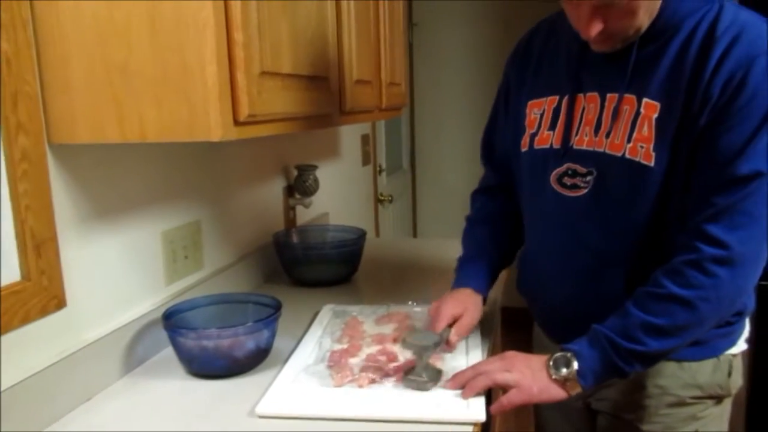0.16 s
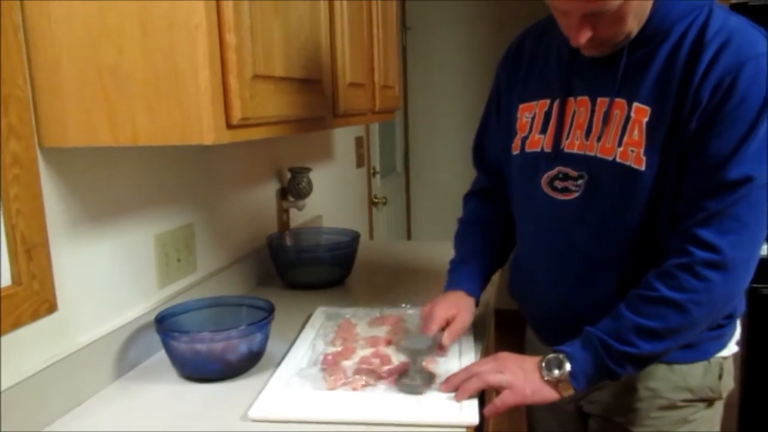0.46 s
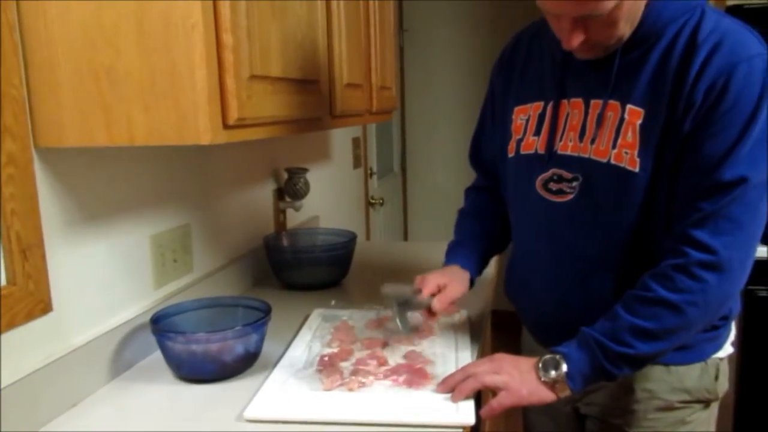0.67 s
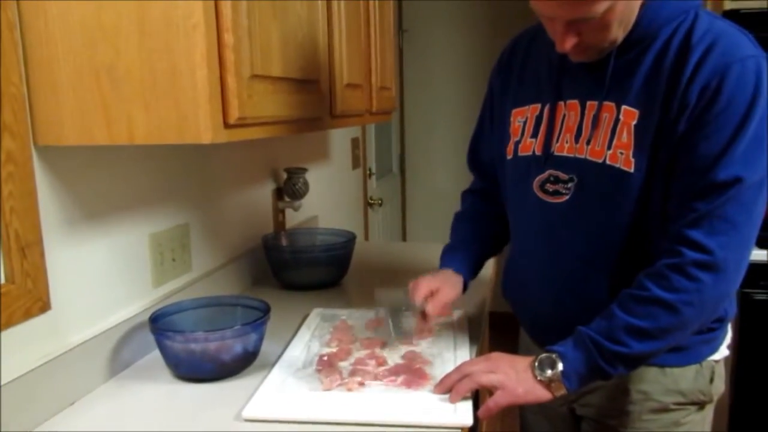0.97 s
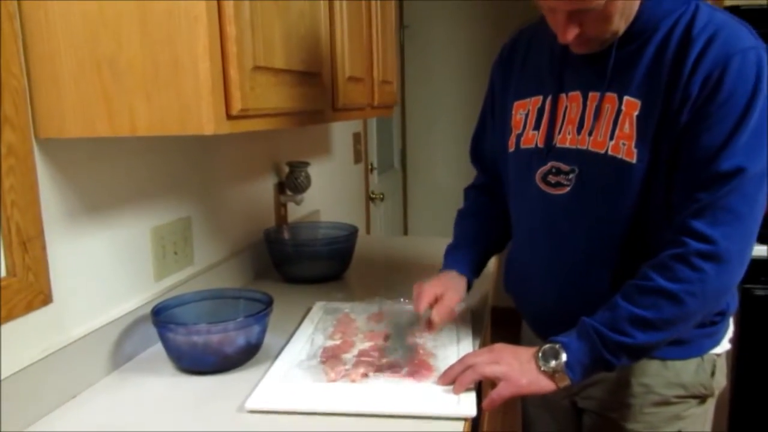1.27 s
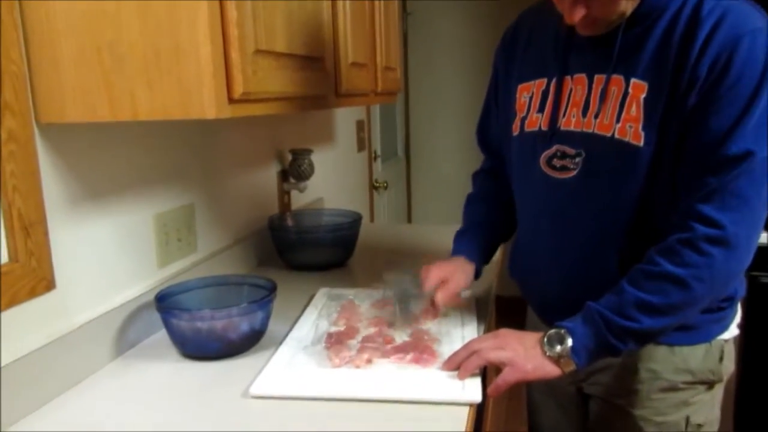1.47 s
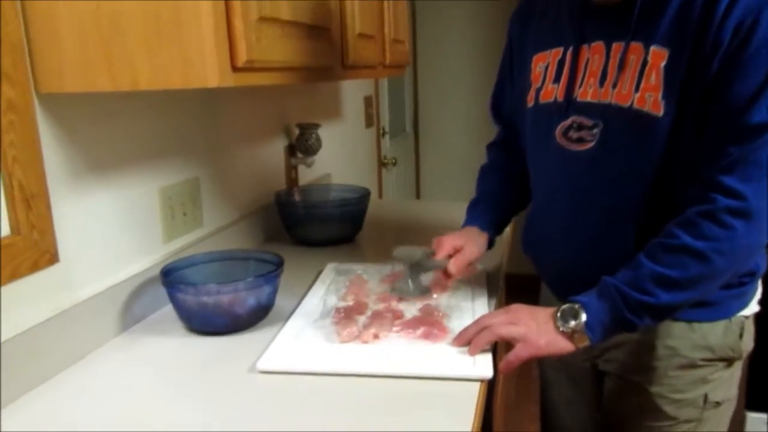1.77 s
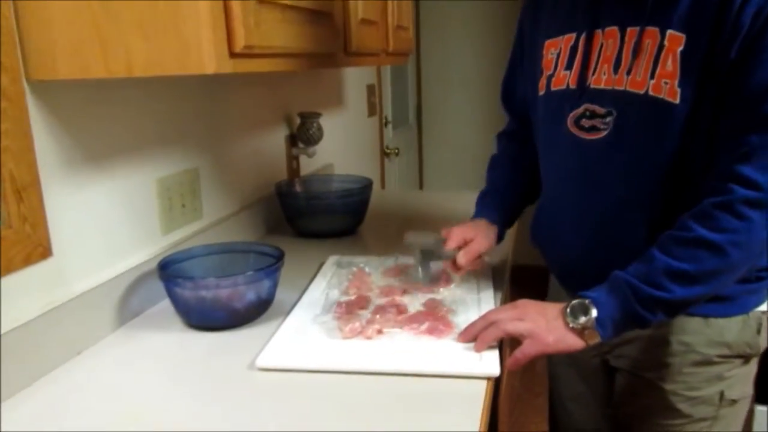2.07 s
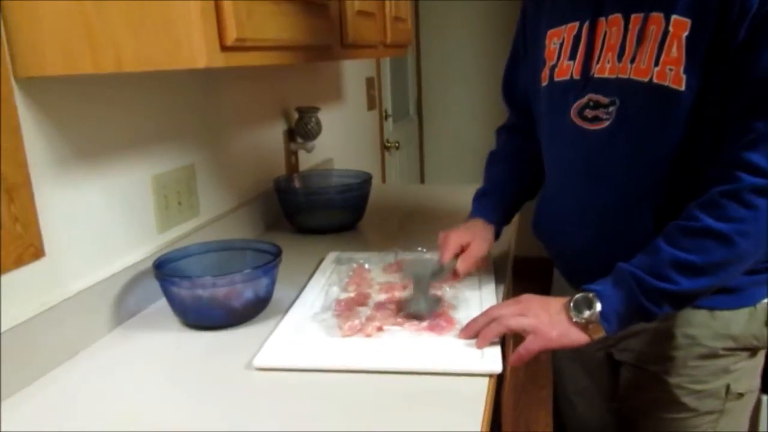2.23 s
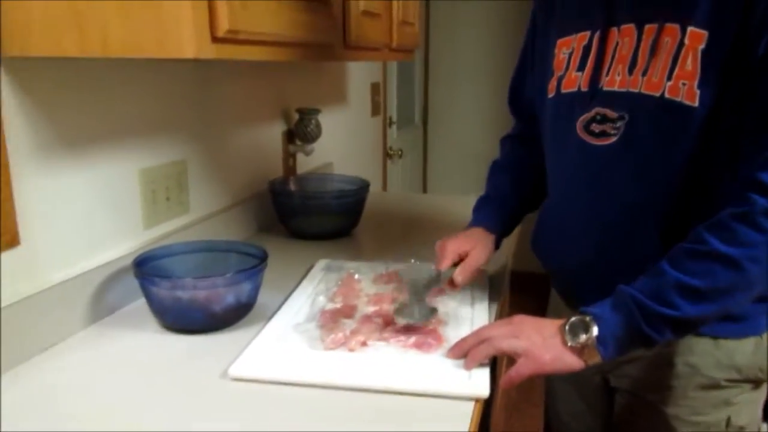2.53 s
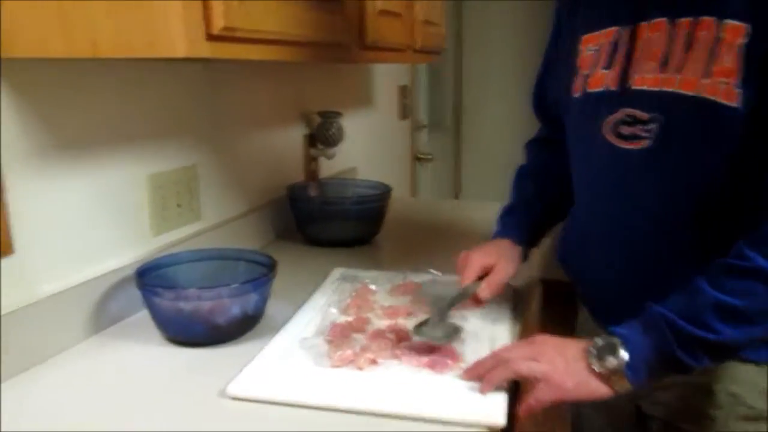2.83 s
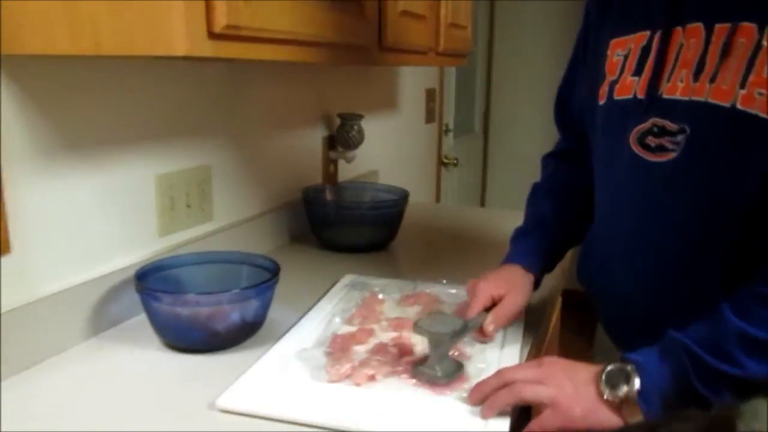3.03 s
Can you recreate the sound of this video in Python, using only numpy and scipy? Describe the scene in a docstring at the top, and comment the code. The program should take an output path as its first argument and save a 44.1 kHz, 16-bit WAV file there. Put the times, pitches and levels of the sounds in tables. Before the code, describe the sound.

A metal mallet pounds film-wrapped meat on a plastic board, about three steady blows a second.

```python
"""A metal mallet pounds wrapped meat on a plastic board, about three blows a second, over a quiet hum.
It opens on the tail of a blow struck just before the start, then each blow cracks and slaps the film
(shaped noise) while it rings the board and thumps the counter (decaying modes). After some blows the
board bounces back with a duller click. Film ticks are scattered through the first two seconds or so;
grainy rustles follow two late blows. The kitchen rings on after each contact as fading bands of noise."""
import sys
import numpy as np
from scipy import signal
from scipy.fft import rfft, irfft
from scipy.io import wavfile

SR = 44100
rng = np.random.default_rng(int(sys.argv[2]) if len(sys.argv) > 2 else 0)


def wav_out(sig):
    """Save sig, one row per channel (or a flat mono array), as 16-bit PCM at SR to the path in sys.argv[1]."""
    wavfile.write(sys.argv[1], SR, np.round(np.clip(np.atleast_2d(sig).T, -1, 1) * 32767).astype(np.int16))


N = 141120
T = np.arange(N) / SR


def undb(db):
    """Decibels to linear gain."""
    return 10 ** (np.asarray(db) / 20)


def read(table, hz):
    """Value of an (Hz, value) table, interpolated on a log-frequency axis."""
    table_hz, values = np.array(table)[:, 0], np.array(table)[:, 1]
    return np.interp(np.log(hz + 1), np.log(table_hz), values)


def noise(gain_of_hz, size=N):
    """Noise with the given gain at each frequency, scaled to rms 1."""
    spectrum = rfft(rng.standard_normal(size))
    shaped = irfft(spectrum * gain_of_hz(np.fft.rfftfreq(size, 1 / SR)), size)
    return shaped / shaped.std()


def band(centre_hz, octaves):
    """Bell-shaped gain on an octave axis; octaves is its standard deviation."""
    return lambda hz: np.exp(-.5 * (np.log2((hz + 1) / centre_hz) / octaves) ** 2)


def burst(start, rise, fall):
    """Envelope that rises and dies away; the slower the rise against the fall, the lower its peak under 1."""
    since = np.maximum(T - start, 0)
    return (1 - np.exp(-since / rise)) ** 2 * np.exp(-since / fall)


def ring(start, hz, gain, t60):
    """Sum of exponentially decaying sine modes struck at start, cut off after 1.5 s."""
    since = np.maximum(T - start, 0)[:, None]
    since = since[T < start + 1.5]
    modes = np.sin(2 * np.pi * hz * since) * np.exp(-np.log(1000) * since / t60)
    out = np.zeros(N)
    out[:len(since)] = modes @ gain
    return out


# colour of the hum: (frequency [Hz], relative level [dB per Hz])
HUM_COLOUR = [(18, -43), (30, 11), (499, -5.5), (540, -7), (801, -24), (1070, -19.5), (1280, -12.5),
              (1630, -18.5), (1910, -25), (3400, -33), (5170, -28), (5900, -31.5), (7670, -24),
              (8740, -34.5), (9970, -31.5), (16000, -39)]
HUM_DB = -46.5  # rms level


def hum():
    """The quiet hum of the kitchen: steady noise shaped by its spectrum."""
    return undb(HUM_DB) * noise(lambda hz: undb(read(HUM_COLOUR, hz)))


# how long the kitchen rings: (frequency [Hz], time to fall 60 dB [s])
KITCHEN_T60 = [(300, 0.51), (740, 0.43), (1940, 0.38), (5120, .4), (9000, 0.35), (13500, 0.24)]
# sends into the kitchen [dB], and how fast the wash builds
SLAP_ECHO_DB, BOARD_ECHO_DB, CLICK_ECHO_DB, KITCHEN_RISE_S = -17, -7, -27.5, 0.0016


def echo():
    """The diffuse wash of the kitchen after every contact, dying band by band."""
    contacts = BLOWS + BOUNCES
    out = 0
    for hz in 240 * 2 ** np.arange(0, 6.2, 1 / 4):  # quarter-octave bands
        fall = read(KITCHEN_T60, hz) / np.log(1000)
        wood = [undb(board_db(hz, row) + BOARD_ECHO_DB) * (hz < 1600) for row in contacts]
        sharp = [undb(slap_db(hz, *row[5:8]) + SLAP_ECHO_DB) * np.sqrt(hz / 4000) * (hz > 700)
                 for row in BLOWS]
        sharp += [undb(row[5] + CLICK_ECHO_DB) * band(row[6], CLICK_OCTAVES)(hz) for row in BOUNCES]
        # the washes of separate contacts add in power
        power = sum((w ** 2 + s ** 2) * burst(row[0], KITCHEN_RISE_S, fall) ** 2
                    for w, s, row in zip(wood, sharp, contacts))
        out = out + np.sqrt(power) * noise(band(hz, 0.13))
    return out


# single film ticks: (time [s], level before the envelope [dB], centre [Hz])
TICKS = [(.0715, -24.5, 7140), (.59, -34.5, 7400), (.6564, -37, 4300), (1.1159, -41, 1640),
         (2.0757, -38, 2440)]
TICK_S = 0.00068  # fall time; the rise takes half of it


def film_ticks():
    """Single ticks of the wrap: very short bursts of band noise."""
    return sum(undb(db) * burst(start, TICK_S / 2, TICK_S) * noise(band(hz, 0.35))
               for start, db, hz in TICKS)


# film peels off the meat:
# (time [s], rise [s], fall [s], level before the envelope [dB], centre [Hz], width [octaves])
RUSTLES = [(2.256, 0.0024, 0.064, -39.5, 5120, 0.41), (2.259, 0.0025, 0.055, -40.5, 1540, 0.18),
           (2.27, 0.008, 0.049, -43, 2420, 0.33), (2.546, 0.0062, .06, -39, 6300, 0.35),
           (2.547, 0.006, 0.044, -42.5, 1240, 0.32), (2.547, .006, 0.056, -47, 2570, 1)]
GRAINS_PER_S, GRAIN_S, GRAIN_SPREAD_DB = 3400, 0.006, 3  # mean rate, decay of a grain, mean rise in level


def film_rustles():
    """Peeling film: random grains of uneven level, each dying away, roughen bursts of band noise."""
    chance = rng.random((2, N))
    happens = chance[0] < GRAINS_PER_S / SR
    pops = happens * undb(-GRAIN_SPREAD_DB * np.log(1 - chance[1]))
    grains = signal.lfilter([1], [1, -np.exp(-1 / (GRAIN_S * SR))], pops)
    grains = grains / np.sqrt(np.mean(grains ** 2))
    return sum(undb(db) * burst(start, rise, fall) * grains * noise(band(hz, octaves))
               for start, rise, fall, db, hz, octaves in RUSTLES)


# counter and cabinet modes: (frequency [Hz], level relative to the contact [dB], time to fall 60 dB [s])
COUNTER_MODES = [(36.9, -21, 0.44), (43.9, -18, 0.37), (58.94, -22, 0.52), (68.2, -27, 0.49),
                 (85.2, -14, 0.25), (99.45, -29, 0.6), (150, -14.5, 0.12), (154.3, -19.5, 0.63),
                 (178.8, -25.5, 0.52), (200, -17, 0.36), (211.1, -22.5, .19), (244.5, -53, 0.24),
                 (285.6, -31, 0.086)]
# (first swing of each counter mode, toward or away from the microphone [+1 or -1])
COUNTER_WAY = [1, -1, -1, -1, 1, -1, 1, -1, 1, -1, 1, 1, -1]


def counter():
    """Every contact thumps the counter alike: the same modes, only louder or softer."""
    hz, db, t60 = np.array(COUNTER_MODES).T
    return sum(ring(row[0], hz, undb(db + row[1]) * COUNTER_WAY, t60) for row in BLOWS + BOUNCES)


# board modes: (frequency [Hz], level relative to the contact [dB], time to fall 60 dB [s])
BOARD_MODES = [(265.6, -3.5, 0.14), (289.4, -10.5, 0.11), (332, -12.5, 0.21), (416, -4.5, 0.24),
               (457, -3.5, 0.063), (518, -4, 0.24), (575.3, -3.5, 0.17), (606, -8.5, 0.07),
               (724, -15.5, 0.15), (796, -30.5, 0.017), (1035, -11, 0.02), (1195, -18, 0.23),
               (1234, -4.5, 0.064), (1380, -64, 0.055)]
SPOT_DB, SPOT_DETUNE = 3.5, 0.0041  # random spread of each mode's level, and of its pitch as a fraction
BOARD_TREBLE_HZ = 800  # tilt shapes the board below this, the treble level above


def board_db(hz, row):
    """Level of the board at each frequency for one contact."""
    _, _, level_db, tilt_db, treble_db = row[:5]
    balance = np.where(hz < BOARD_TREBLE_HZ, tilt_db * np.log2(hz / 500), treble_db)
    return read(BOARD_MODES, hz - 1) + level_db + balance


def board():
    """The board rings with a balance set by the spot struck; neighbouring modes start opposite ways."""
    hz, _, t60 = np.array(BOARD_MODES).T
    way = (-1) ** np.arange(len(hz))
    out = 0
    for row in BLOWS + BOUNCES:
        detune, spot = rng.standard_normal((2, len(hz)))
        gain = way * undb(board_db(hz, row) + SPOT_DB * spot)
        out = out + ring(row[0], hz * (1 + SPOT_DETUNE * detune), gain, t60)
    return out


# the board bounces back onto the counter; counter, board and echo play these too:
# (time [s], counter level [dB], board level [dB], board tilt [dB per octave], board treble [dB],
#  click level before the envelope [dB], click centre [Hz])
BOUNCES = [(.168, -16, -28, -7, 6.5, -19.5, 2400), (0.497, -29, -28, -6, 1, -26.5, 2160),
           (0.8818, -19.5, -35.5, -7, 6, -26, 2040), (1.222, -21, -31.5, -10, 2, -27.5, 2240),
           (2.258, -26, -31.5, 2, -3.5, -30.5, 1700), (2.5449, -46, -36, 15.5, -3.5, -40, 3160)]
CLICK_RISE_S, CLICK_FALL_S, CLICK_OCTAVES = .0005, .003, 0.69


def bounce_clicks():
    """A click duller than the slap as the board lands: a short burst of band noise."""
    out = 0
    for start, *_, level_db, hz in BOUNCES:
        click = burst(start, CLICK_RISE_S, CLICK_FALL_S) * noise(band(hz, CLICK_OCTAVES))
        out = out + undb(level_db) * click
    return out


# mallet blows, the first just before the start; counter, board and echo play these too:
# (time [s], counter level [dB], board level [dB], board tilt [dB per octave], board treble [dB],
#  slap level before the envelope [dB], slap tilt [dB per octave], slap top [dB], crack level [dB])
BLOWS = [(-.19, 0.5, -18, 6, 0, -14.5, -1, -3, -14), (0.1361, 1.5, -24.5, -11, -17, -14, 1.5, -1, -18),
         (0.4621, 1, -26, -12, 2.5, -16.5, -1, -0.5, -14.5),
         (0.852, -6, -39.5, -11, 6.5, -24.5, 1.5, 1, -28.5), (1.1894, 0, -26.5, 0, 7, -15.5, 3, -4.5, -16),
         (1.5307, 2, -20.5, -2.5, 5.5, -13, -0.5, 0.5, -12.5),
         (1.8504, 2.5, -23.5, -2, 8.5, -14.5, 1.5, 1, -19),
         (2.1546, 2, -20, 0.5, -1.5, -15.5, 1.5, -4, -16), (2.4409, 0, -25, -2.5, -12, -16, 1.5, -7.5, -20),
         (2.7232, 1, -23.5, 0.5, -7.5, -17.5, 1, 0.5, -20.5),
         (3.0085, 0.5, -32.5, -11, 4.5, -18.5, 0.5, 7.5, -18.5)]
# colour shared by all slaps: (frequency [Hz], relative level [dB per Hz])
SLAP_COLOUR = [(410, 26), (700, -6.5), (922, -13), (1350, -1.5), (1840, -8), (2100, -6.5), (3550, -16),
               (5540, -11.5), (8100, -15.5), (16000, -35)]
SLAP_RISE_S, SLAP_FALL_S = 0.003, 0.0055
SLAP_FLOOR_HZ = 756  # the slap thins out below this
SLAP_TOP_HZ = 8900  # the slap's top setting fades in over the octave around this
CRACK_LAG_S, CRACK_RISE_S, CRACK_FALL_S = .0015, .0007, .0012  # the crack peaks one lag after contact


def slap_db(hz, level_db, tilt_db, top_db):
    """Level of a slap at each frequency: shared colour, tilted about 4 kHz, with its own top."""
    top = np.clip(np.log2((hz + 1) / SLAP_TOP_HZ) + .5, 0, 1)
    return read(SLAP_COLOUR, hz) + level_db + tilt_db * np.log2((hz + 1) / 4000) + top_db * top


def slaps():
    """A sharp crack of metal on film inside a wet slap: two envelopes on one shaped noise."""
    out = 0
    for start, *_, level_db, tilt_db, top_db, crack_db in BLOWS:
        from_peak = T - start - CRACK_LAG_S
        crack = np.exp(-np.abs(from_peak) / np.where(from_peak < 0, CRACK_RISE_S, CRACK_FALL_S))
        slap = burst(start, SLAP_RISE_S, SLAP_FALL_S)
        envelope = undb(crack_db) * crack + undb(level_db) * slap

        def colour(hz):
            bass_cut = 1 + (SLAP_FLOOR_HZ / (hz + 1)) ** 4
            return undb(slap_db(hz, 0, tilt_db, top_db)) / bass_cut

        out = out + envelope * noise(colour)
    return out


def scene():
    """All layers summed to one channel, from the background to the blows."""
    background = hum() + echo()
    film = film_ticks() + film_rustles()
    return (background + film + counter() + board() + bounce_clicks() + slaps())[None]


TOP_HZ = 15750  # edge of the treble cut


def record(dry):
    """A steep elliptic low-pass cuts the top of the treble."""
    lowpass = signal.ellip(8, .2, 70, TOP_HZ, fs=SR, output="sos")
    return signal.sosfilt(lowpass, dry)


dry = scene()
out = record(dry)
wav_out(out)
```